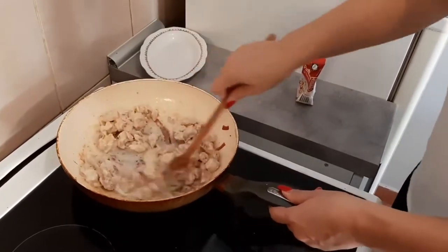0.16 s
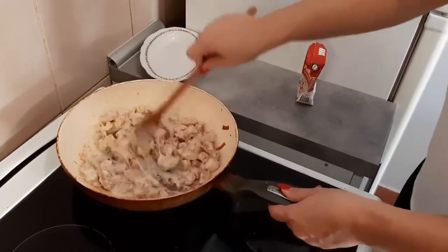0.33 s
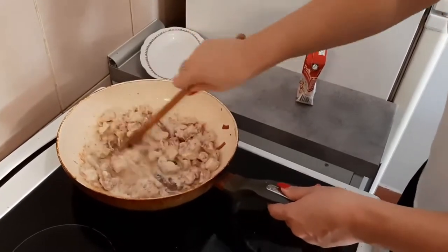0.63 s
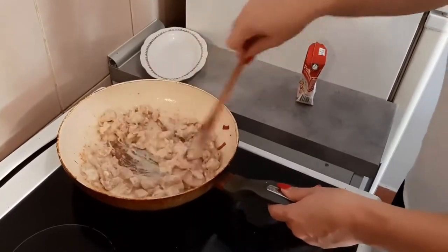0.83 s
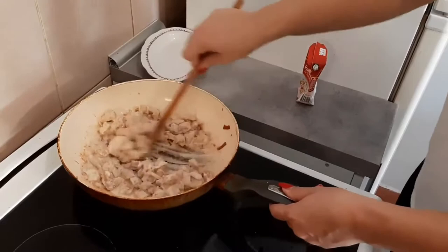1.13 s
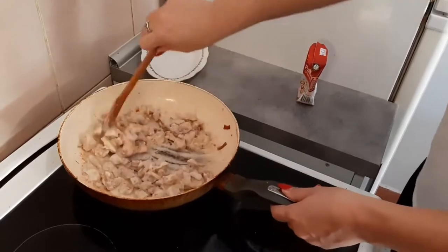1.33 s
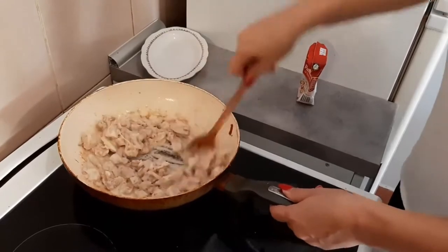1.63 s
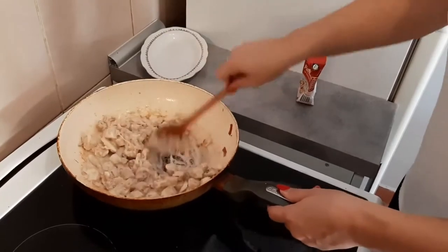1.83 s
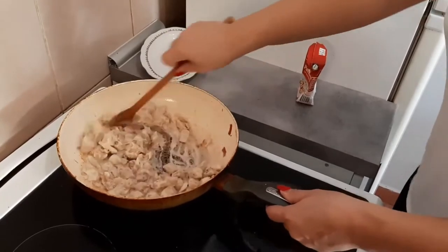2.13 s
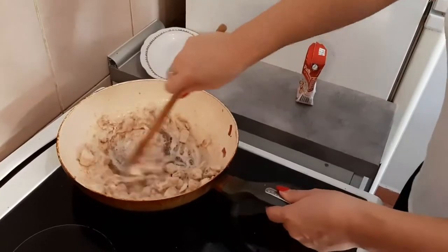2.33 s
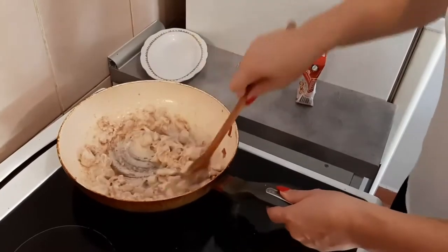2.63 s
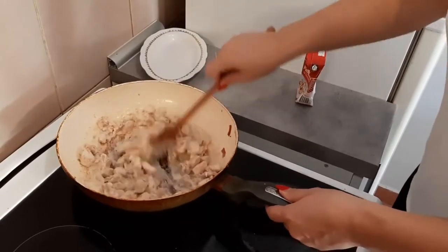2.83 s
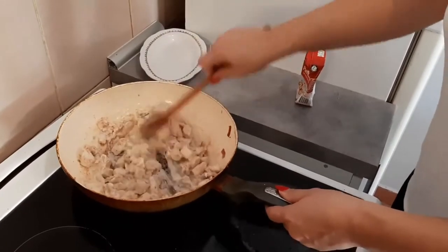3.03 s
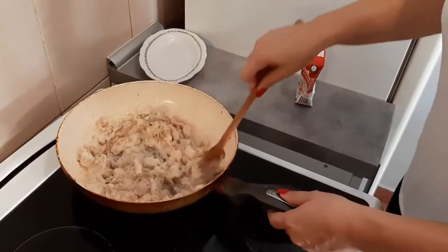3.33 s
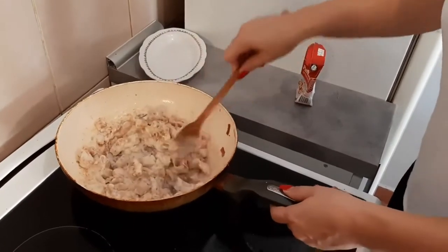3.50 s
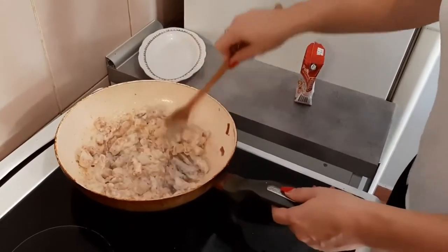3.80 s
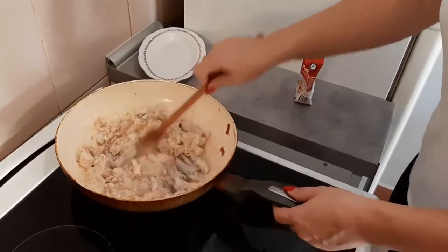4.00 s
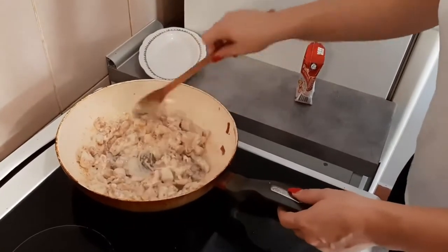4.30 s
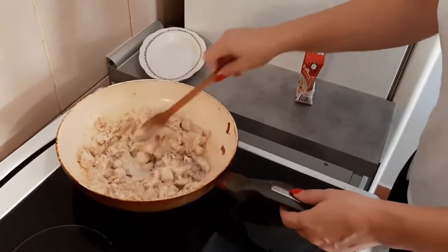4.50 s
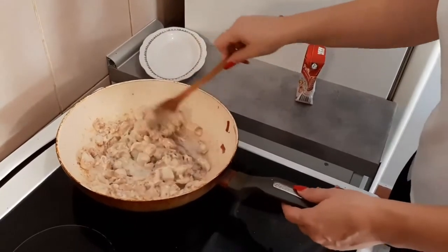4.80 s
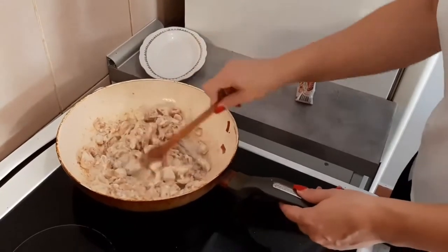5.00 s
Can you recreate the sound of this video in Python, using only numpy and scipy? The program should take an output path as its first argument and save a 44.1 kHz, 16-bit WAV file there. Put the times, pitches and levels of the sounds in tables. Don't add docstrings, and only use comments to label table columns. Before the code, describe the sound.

A quiet kitchen, about five seconds, heard close in stereo, the left side slightly nearer. A steady low appliance hum lies under a soft, grainy sizzle of creamy sauce, which swells and dips with quick, uneven spatula strokes. Small wet bubbles pop throughout, one early at 0.24. Low muffled rocking and thuds come from the pan base on glass. At 1.08 wood hits the rim with a bright, dry, chattering knock and a faint ring, followed by a short skid. A tiny sharp spit sits left at 1.54. From 1.6 to 2.0 stirring is busiest: thuds, scrapes, light taps and dry clicks, with a strong scrape and pop near 2.0. Then it eases, with a thud at 2.45 and small ticks around 3.2 to 3.3. A hard, duller base knock lands at 3.78, followed by a crisp pop at 3.86. The drag becomes fainter while sizzling continues to the end, with a short echo.

```python
import sys
import numpy as np
from scipy import signal
from scipy.io import wavfile
from scipy.ndimage import uniform_filter1d

SR = 44100
rng = np.random.default_rng(int(sys.argv[2]) if len(sys.argv) > 2 else 0)


def voltage_ratio(decibels):
    exponent = np.asarray(decibels, float) / 20
    return 10 ** exponent


def master(y):
    cut = np.clip(np.atleast_2d(y).T, -1, 1)
    pcm = np.round(cut * 32767)
    wavfile.write(sys.argv[1], SR, pcm.astype(np.int16))


N = 227104

# middle [s], length [s], sizzle [dB], wet drag [dB], rocking [dB].
STROKES = [(0.043, 0.068, -57.5, -57, -67), (0.185, 0.27, -63, -67, -55), (0.406, 0.17, -56.5, -54.5, -56),
           (0.568, 0.08, -61.5, -63.5, -56), (0.766, 0.13, -58, -78, -48.5), (0.86, 0.12, -56.5, -57, -64),
           (1.214, 0.17, -54, -57.5, -50), (1.652, 0.14, -56.5, -55.5, -51),
           (1.814, 0.14, -54.5, -49, -42.5), (2.026, 0.13, -56, -51, -57), (2.167, 0.13, -71, -56.5, -44),
           (2.33, 0.15, -59, -72, -77), (2.503, 0.23, -57, -59.5, -50), (2.797, 0.065, -60, -62, -61),
           (2.94, 0.16, -56, -66, -47.5), (3.27, 0.16, -58.5, -75, -54), (3.632, 0.21, -64, -64.5, -52),
           (3.875, 0.12, -56, -53, -47), (4.16, 0.22, -64, -64, -69), (4.35, 0.28, -70.5, -73, -52),
           (4.624, 0.14, -60, -69.5, -51.5), (4.847, 0.11, -64, -78, -64),
           (5.138, 0.061, -58.5, -67, -49.5)]
# sizzle, drag and rocking [dB].
REST_DB = [-65, -63.5, -61]
# sizzle, drag and rocking [dB per s].
SETTLE_DB_PER_S = [0.02, 4.5, 1.3]
# frequency [Hz], level [dB per Hz].
FIZZ_SPECTRUM = [(600, -33), (900, -6.5), (1200, -9.5), (1850, -1.5), (2250, -8), (2600, -7), (3100, -2.5),
                 (3600, -0.5), (4900, 1.5), (6800, -0.5), (7700, -7), (11000, -5), (15000, -3.5),
                 (17000, -3)]
# middle [s], length [s], fine spray [dB].
PUFFS = [(0.044, 0.04, -60.5), (.38, 0.089, -70.5), (.85, 0.088, -69.5), (2.29, 0.14, -67),
         (2.493, 0.08, -66), (2.68, 0.15, -73.5), (2.93, 0.2, -74), (3.576, 0.057, -69.5),
         (4.914, 0.048, -66), (5.13, 0.065, -74)]
# start [s], peak [dB], pitch [Hz], fizz length [s], click share [0-1].
POPS = [(0.041, -38.5, 5300, 0.03, 0), (0.239, -33.5, 3850, 0.01, 0.57), (0.526, -44, 5600, 0.03, 0.4),
        (0.545, -36, 3200, 0.013, 0.34), (0.647, -47.5, 4000, .008, 1), (0.807, -36.5, 5050, 0.031, 0.9),
        (0.884, -35, 3000, 0.011, 0), (1.504, -40.5, 6480, 0.018, .4), (1.681, -40, 5450, .0051, 0.7),
        (1.8444, -28.5, 5110, 0.021, 0.5), (1.987, -26, 3260, 0.048, 0), (2.314, -34.5, 3900, 0.017, 0.4),
        (2.469, -39, 2820, 0.041, 0.15), (2.905, -41.5, 4600, 0.071, 0.05), (3.2214, -33, 5370, 0.011, 0.4),
        (3.309, -35.5, 3200, 0.024, 0.06), (3.558, -40, 5500, 0.027, .05), (3.624, -39, 4660, 0.026, 0.47),
        (3.8565, -27, 6500, 0.011, 0.3), (4.157, -42, 6800, 0.015, 0.5), (4.174, -42, 3200, 0.041, 0),
        (4.904, -38.5, 5040, 0.044, 0.4), (5.064, -44.5, 4000, 0.0041, 0.9),
        (5.107, -38, 5400, 0.039, 0.24)]
# start [s], peak [dB], left-right difference [dB].
SPITS = [(1.5362, -31.5, 24.5)]
# frequency [Hz], width [Hz], level [dB].
PAN_MODES = [(336, 107, -8.5), (616.6, 10.2, -1.5), (714, 19.4, -8), (895, 22, -9), (1083, 83, -15),
             (1222, 8.4, -7), (1450, 180, -28.5), (1533, 40, -8.5), (1900, 1200, -19), (2310, 78, -6.5),
             (2830, 640, -17.5), (3630, 39, -1), (4000, 150, -8), (5100, 200, -11)]
# start [s], peak [dB], length [s], centre frequency [Hz].
SKIDS = [(0.021, -51.5, 0.048, 1900), (0.411, -48, 0.028, 523), (0.795, -49, 0.052, 2160),
         (0.884, -66, 0.038, 1390), (1.117, -47, 0.064, 2850), (1.165, -41, 0.0096, 2590),
         (1.212, -53, .035, 1500), (1.582, -42.5, 0.039, 1140), (1.639, -46.5, 0.058, 724),
         (1.75, -50, 0.055, 1150), (1.819, -42.5, 0.038, 950), (1.831, -37.5, 0.015, 2780),
         (1.981, -36, 0.031, 1000), (2.007, -35, 0.02, 1100), (1.984, -32.5, 0.031, 1400),
         (1.998, -42, 0.042, 3545), (2.455, -58, 0.05, 440), (2.444, -53, 0.022, 1320),
         (2.466, -61, 0.2, 1900), (2.776, -63.5, 0.41, 2060), (3.29, -53.5, 0.043, 1770),
         (1.977, -47, 0.044, 686), (4.569, -54, 0.023, 1800)]
# start [s], peak [dB].
TICKS = [(1.8441, -24), (1.8531, -28), (1.9826, -27), (2.0046, -21), (3.2238, -33), (3.3156, -35)]
# (frequency [Hz], peak [dB], t60 [s]).
TAPS = [(1.584, [(708, -38, 0.077), (891, -46, .14), (1200, -45.5, 0.12), (1610, -51.5, 0.043)]),
        (1.639, [(694, -53, 0.11), (904, -44.5, 0.11), (1080, -47, .06)]), (1.664, [(611, -49.5, 0.16)]),
        (1.8425, [(2200, -42, .03), (5100, -40, .03), (1100, -44, 0.027)]), (1.849, [(4000, -45, .06),
        (2380, -49, 0.054)]), (1.9815, [(1110, -32, 0.039), (628, -41, .08), (1700, -50, .03)]),
        (1.993, [(1580, -38, 0.085)]), (2.003, [(804, -43, .03), (1510, -37, 0.043)]),
        (2.0155, [(1263, -34, .05)]), (2.3155, [(2190, -50, 0.028), (3015, -43.5, 0.036),
        (3900, -47, 0.056), (4200, -51, .07), (5700, -44, .06), (6191, -44, .08)]),
        (.238, [(3850, -51, .04)]), (3.8555, [(6440, -46, .03), (3800, -51, .06)]),
        (1.274, [(3080, -43.5, .04)]), (2.474, [(3140, -47, .05)]), (2.495, [(1780, -52, 0.054)])]
# middle [s], length [s], peak [dB], pitch [Hz].
SINGS = [(1.146, 0.018, -49, 2780), (1.095, .012, -46, 3100), (1.108, .01, -45, 3050),
         (1.772, 0.026, -47, 905), (1.8, .016, -53, 1150), (2.96, 0.076, -63, 2050), (2.81, .03, -64, 1800),
         (2.03, 0.02, -43, 1200), (2.014, 0.046, -53, 3300), (3.817, 0.016, -39.5, 2690),
         (2.0, 0.03, -46.5, 612), (2.005, 0.039, -48.5, 752), (0.13, 0.32, -66, 540),
         (3.867, .016, -55, 3800)]
# start [s], peak [dB].
KNOCKS = [
    (1.079, -14.5),
    (3.7772, -13),
]
# frequency [Hz], level [dB], t60 [s].
RIM_MODES = [(644, -23, 0.052), (925, -23, 0.065), (1340, 4, 0.015), (1510, 3, 0.038), (1574, 2, 0.017),
             (2640, 0, 0.0081), (2714, -2, 0.055), (3110, 11.5, 0.012), (3670, 11, 0.016), (4070, 5, 0.012),
             (5260, 8, 0.0053), (6200, -5, 0.0051)]
# frequency [Hz], level [dB], t60 [s].
BASE_MODES = [(608, -35, 0.12), (880, -12, 0.016), (1080, 2, 0.012), (1440, 11, 0.0081), (1770, 0, 0.013),
              (1900, 5, 0.01), (2220, 0, 0.031), (2430, 9, 0.0066), (3200, -3, 0.013), (3590, -1, 0.013),
              (4460, -7, 0.0071), (5720, -3, 0.0061)]
# frequency [Hz], level [dB], t60 [s].
WALL_MODES = [
    [(900, -20, 0.074), (1324, -27, 0.07), (1500, -27, 0.11), (2690, -21, 0.071), (2806, -16, 0.13),
     (3160, -28, 0.077)],
    [(605, -34, 0.14), (890, -21, 0.09), (945, -24.5, 0.095), (1380, -40, 0.074), (2150, -26, 0.13),
     (2730, -33, 0.15)],
]
# delay [s], level against the first blow [dB].
BOUNCES = [
    [(.0062, -7), (.0082, -16), (.0135, -11), (.0185, -16), (.027, -16), (.037, -28)],
    [(.0066, -10), (.0094, -9.5), (.0168, -17), (.02, -12), (.025, -19)],
]
# start [s], peak [dB], pitch [Hz], t60 [s].
THUDS = [(0.31, -44, 192.8, 0.46), (0.38, -36, 196, 0.18), (0.724, -48, 193.6, 0.51),
         (0.819, -43, 194.2, 0.22), (1.084, -37, 200, 0.14), (1.248, -42, 170, 0.077),
         (1.585, -37.5, 202, 0.16), (1.638, -26.5, 202.5, 0.075), (1.667, -32.5, 204, 0.12),
         (1.77, -33, 180, 0.09), (1.791, -33, 164, 0.07), (1.817, -30, 213.6, 0.14),
         (1.975, -37, 191, 0.078), (2.129, -38, 201.6, 0.094), (2.135, -44, 86, 0.18),
         (2.25, -52, 85, 0.12), (2.16, -35, 191.6, 0.13), (2.449, -31, 199.3, 0.099),
         (3.234, -45.5, 197.5, 0.19), (3.561, -43, 193, 0.074), (3.784, -36.5, 201, 0.17),
         (3.86, -37, 195, 0.13), (4.608, -49, 197.9, 0.65)]
# frequency [Hz], level [dB per Hz].
HUM_SPECTRUM = [(25, -39), (48, -25), (64, -47), (97, 2), (120, -25), (146, 1.5), (170, 0.5), (197, -8.5),
                (250, -12), (330, -11), (480, -13), (580, -24.5), (800, -26), (1200, -67)]
# time [s], level [dB].
UPPER_DRONE = [(0, -0.5), (.9, 3), (1.4, -3.5), (3, -2), (5.15, -5.5)]
# frequency [Hz], level [dB].
HUM_TONES = [(48.4, -75.5)]
# frequency [Hz], left-right likeness [0-1].
LIKENESS = [(60, 0.97), (250, 0.91), (700, 0.72), (2000, 0.039), (5000, 0.16), (12000, 0.03)]
# frequency [Hz], t60 [s].
KITCHEN_T60 = [(200, 0.93), (700, 0.3), (2000, 0.21), (6000, 0.1), (12000, 0.12)]


def sizzle():
    spray_rest_db, spray_follows = -70, 0.17

    def field_db(hz, t):
        spray = 1 / (1 + (7500 / (hz + 1)) ** 8)
        body_db = stirring(0, t)
        spray_db = spray_rest_db + spray_follows * (body_db - REST_DB[0])
        steam = swells(*np.array(PUFFS).T[:, :, None], t)
        fine_db = 10 * np.log10(voltage_ratio(2 * spray_db) + steam)
        return read(FIZZ_SPECTRUM, hz) + body_db + spray * (fine_db - body_db + 5.5)

    level = at_samples(0)
    haze = wash(field_db, size=256, patchy_db=2.0, flicker_db=0.68)
    haze /= np.sqrt(np.mean((haze / level) ** 2))
    bursts = voltage_ratio(4.5 * np.minimum(rng.exponential(1, (2, N)), 4))
    bursts *= rng.random((2, N)) < 250 / SR
    bursts *= rng.choice([-1, 0, 0, 1], (2, N))
    crackle = sum(resonate(bursts, hz, hz * 0.24) for hz in (3280, 4100, 5140, 5860, 11000))
    return voltage_ratio(4.0) * haze + voltage_ratio(-10.0) * level * evened(crackle)


def pops():
    out, t = np.zeros((2, N)), np.arange(0, .15, 1 / SR)
    for s, db, hz, length, share in POPS:
        share = np.clip(share, 0, 1)
        top_hz = min(hz * (1.11 + 3.6 * (1 - share) ** 4), 15500)
        click = np.sin(2 * np.pi * hz * t) * np.exp(-t / .0025)
        noise = rng.standard_normal((2, len(t)))
        noise = noise + 0.078 * noise.sum(0)
        band = resonate(noise, hz, hz * 0.53) + 0.25 * passed(pan_body(noise), 2000, "high")
        rise = np.minimum(t / .0012, 1)
        fizz = evened(passed(band, top_hz, "low")) * np.exp(-(t / max(length, .002)) ** 4.0) * rise
        mist_shape = np.exp(-(t / (2.3 * length)) ** 2)
        mist = voltage_ratio(-36) * (1 - share) ** 2 * passed(noise, 6400, "high") * mist_shape
        add(out, s, voltage_ratio(db) * (share * click + 0.12 * fizz + mist))
    return out


def spit():
    out, u = np.zeros((2, N)), np.arange(0, .01, 1 / SR) / .00003
    for s, db, side_db in SPITS:
        gain = voltage_ratio(db + np.array([[side_db], [-side_db]]) / 2)
        add(out, s, gain * (1 - u) * np.exp(-u))
    return out


def scrape():
    slips = rng.standard_normal(N) * voltage_ratio(4.16 * np.minimum(rng.exponential(1, N), 4))
    slips *= rng.random(N) < 2500 / SR
    body = pan_body(slips) + .06 * slips
    dull = passed(passed(body, 400, "high", order=2), 2300, "low", order=2)
    out = at_samples(1) * voltage_ratio(-6.5) * evened(dull)
    t = np.arange(0, .3, 1 / SR)
    for s, db, length, centre_hz in SKIDS:
        part = body[round(s * SR):][:len(t)]
        part = skid_colour(part, centre_hz, 1.7 * centre_hz)
        rise = np.minimum(t / max(0.13 * length, .001), 1)
        shape = rise * np.exp(-(t / max(length, .005)) ** 5.6)
        add(out, s, voltage_ratio(db - 9.0) * evened(part) * shape)
    return out


def skid_colour(part, centre_hz, top_hz):
    near = part
    for _ in range(2):
        near = resonate(near, centre_hz, centre_hz * 0.68)
    return passed(near + 0.051 * passed(part, 340, "high"), top_hz, "low", order=3)


def pan_body(x):
    return sum((-1) ** k * voltage_ratio(db) * resonate(x, hz, width) for k, (hz, width, db) in enumerate(PAN_MODES))


def ticks():
    out, u = np.zeros(N), np.arange(0, .01, 1 / SR) / .00008
    for s, db in TICKS:
        add(out, s, -voltage_ratio(db) * (1 - u) * np.exp(-u))
    return passed(out, 6500, "low", order=2)


def taps():
    out, t = np.zeros(N), np.arange(0, .2, 1 / SR)
    for s, modes in TAPS:
        ring = sum(voltage_ratio(db - 60 * t / max(t60, .01)) * np.sin(2 * np.pi * hz * t) for hz, db, t60 in modes)
        add(out, s, ring * (1 - np.exp(-t / 0.00081)))
    return out


def sings():
    t = np.arange(N) / SR
    waver = evened(uniform_filter1d(rng.standard_normal(N), size=300))
    out = np.zeros(N)
    for s, length, db, hz in SINGS:
        shape = np.sqrt(swells(s, length, np.array([[db]]), t))
        out += shape * np.sin(2 * np.pi * hz * t + 0.69 * waver)
    return out


def knocks():
    out, t = np.zeros(N), np.arange(0, .3, 1 / SR)
    chatter_lengths_s, longest_ring_s = (.016, .009), .05
    strikes = zip(KNOCKS, (RIM_MODES, BASE_MODES), WALL_MODES, BOUNCES, chatter_lengths_s)
    for (s, db), modes, wall, bounces, chatter_s in strikes:
        ring = sum(voltage_ratio(level - 60 * t / np.clip(t60, .006, longest_ring_s)) * np.sin(2 * np.pi * hz * t)
                   for hz, level, t60 in modes)
        chatter = rng.standard_normal(len(t)) * (rng.random(len(t)) < 4000 / SR)
        blows = 0.037 * chatter * np.exp(-t / chatter_s)
        blows[0] = 1
        for delay_s, under_db in bounces:
            blows[round(delay_s * SR)] += voltage_ratio(under_db)
        clack = signal.fftconvolve(blows, ring)[:len(t)]
        clack = passed(clack, 6900, "low", order=8)
        clack = passed(clack, 415, "high", order=3)
        after = sum(voltage_ratio(level - 60 * t / t60) * np.sin(2 * np.pi * hz * t) for hz, level, t60 in wall)
        after = after * (1 - np.exp(-t / 0.0037))
        add(out, s, voltage_ratio(db) * (clack / abs(clack).max() + after))
    return out


def hob():
    push = rng.standard_normal(N)
    upper = resonate(resonate(push, 190.3, 61), 190.3, 61)
    lower = resonate(resonate(push, 147.5, 32), 147.5, 32)
    out = at_samples(2) * voltage_ratio(-6.5) * evened(upper + 0.84 * lower)
    t = np.arange(0, .4, 1 / SR)
    partials = ((1, 1), (.74, 0.42), (1.62, 0.23), (0.56, 0.11), (2.25, 0.091))
    soft_rise = (1 - np.exp(-t / .004)) ** 2
    for s, db, hz, t60 in THUDS:
        tone = sum(gain * np.sin(2 * np.pi * hz * ratio * t) for ratio, gain in partials)
        add(out, s - .005, voltage_ratio(db + 2.0 - 60 * t / max(t60, .03)) * tone * soft_rise)
    return out


def nearby(x):
    bounces = np.zeros((2, 256))
    at = (3 + rng.random((2, 4)) * .0025 * SR).astype(int)
    gains = rng.choice([-1., 1.], at.shape) * voltage_ratio(-4.5) * np.exp(-at / SR / 0.0041)
    np.put_along_axis(bounces, at, gains, 1)
    bright = passed(x, 1240, "high", order=2) * np.ones((2, 1))
    return x + signal.oaconvolve(bright, bounces, axes=1)[:, :N]


def kitchen(x):
    reflections, count, spacing = np.zeros((2, SR // 2)), SR // 40 - 12, 20
    at = 200 + spacing * np.arange(count) + rng.integers(0, spacing, (2, count))
    np.put_along_axis(reflections, at, rng.choice([-1., 1.], at.shape), 1)
    hz, t, z = signal.stft(reflections, SR, nperseg=256)
    decay = voltage_ratio(-60 * t / read(KITCHEN_T60, hz)[:, None])
    tail = signal.istft(z * decay, SR, nperseg=256)[1]
    return signal.fftconvolve(x[None], tail / np.linalg.norm(tail[0]), axes=1)[:, :N]


def hum():
    def field_db(hz, t):
        upper = 1 / (1 + (300 / (hz + 1)) ** 4)
        return read(HUM_SPECTRUM, hz) + control(UPPER_DRONE, 1, t) * upper

    drone = voltage_ratio(-57.5 - 1.5) * evened(wash(field_db, size=4096, patchy_db=1.0, flicker_db=1.1))
    t = np.arange(N) / SR
    waver = evened(uniform_filter1d(rng.standard_normal(N), size=6000))
    tones = sum(voltage_ratio(db + 5.0 + 2.7 * waver) * np.sin(2 * np.pi * hz * t + 2.5 * waver) for hz, db in HUM_TONES)
    return drone + tones


def wash(field_db, size, patchy_db, flicker_db):
    hop = size // 4
    frames, hz = N // hop + 5, np.fft.rfftfreq(size, 1 / SR)[:, None]
    a, b, c, d, patches = rng.standard_normal((frames, len(hz), 5)).T
    patches = uniform_filter1d(uniform_filter1d(patches, size=5, axis=0), size=12, axis=1)
    patches = evened(patches)
    flicker = evened(uniform_filter1d(rng.standard_normal(frames), size=3))
    same = np.clip(read(LIKENESS, hz), 0, 1)
    left = a + 1j * b
    right = same * left + np.sqrt(1 - same ** 2) * (c + 1j * d)
    level_db = field_db(hz, np.arange(frames) * hop / SR) + patchy_db * patches + flicker_db * flicker
    z = np.array([left, right]) * voltage_ratio(level_db)
    return signal.istft(z, nperseg=size, noverlap=size - hop)[1][:, :N]


def stirring(layer, t):
    rows = np.array(STROKES).T[:, :, None]
    rest_db = REST_DB[layer] - SETTLE_DB_PER_S[layer] * t
    return 10 * np.log10(voltage_ratio(2 * rest_db) + swells(*rows[:2], rows[2 + layer], t))


def at_samples(layer):
    t = np.arange(0, N + 128, 128) / SR
    return voltage_ratio(np.interp(np.arange(N) / SR, t, stirring(layer, t)))


def swells(middle, length, db, t):
    steepness = 1.7
    shape = np.exp(-abs(2 * (t - middle) / np.maximum(length, .02)) ** steepness)
    return (voltage_ratio(2 * db) * shape).sum(0)


def resonate(x, hz, width):
    return signal.lfilter(*signal.iirpeak(hz, hz / width, SR), x)


def passed(x, hz, kind, order=4):
    return signal.sosfilt(signal.butter(order, hz, kind, fs=SR, output="sos"), x)


def evened(x):
    return x / np.sqrt(np.mean(x ** 2) + 1e-20)


def read(points, hz):
    f, value = np.transpose(points)
    return np.interp(np.log(hz + 1), np.log(f + 1), value)


def control(table, column, t):
    rows = np.array(table)
    return np.interp(t, rows[:, 0], rows[:, column])


def add(mix, s, sound):
    part = mix[..., round(s * SR):][..., :sound.shape[-1]]
    part += sound[..., :part.shape[-1]]


def scene():
    blade = scrape() + ticks() + taps()
    blows, low, bubbles = knocks(), hob(), pops()
    echo = kitchen(voltage_ratio(-3.5) * blade + voltage_ratio(-3.0) * blows + voltage_ratio(-14.5) * low + voltage_ratio(-3.0) * bubbles.mean(0))
    apart = passed((echo[0] - echo[1]) / 2, 1106, "high", order=1)
    room = echo.mean(0) * 0.78 + np.array([apart, -apart])
    pan = voltage_ratio(-1.0) * nearby(blade + blows + bubbles) + sings() + low + room + sizzle()
    edge = signal.firwin(1023, 15790, window=("kaiser", 9), fs=SR)
    return signal.oaconvolve(pan, edge[None], "same") + spit() + hum()


def top_cut(x):
    return signal.sosfilt(signal.butter(12, 16660, fs=SR, output="sos"), x)


def record(dry):
    lag = 4
    ports = np.array([voltage_ratio(1.73) * dry[0], voltage_ratio(3.0) * np.roll(dry[1], lag)])
    return top_cut(passed(ports, 57, "high", order=2))


dry = scene()
out = record(dry)
master(out)
```